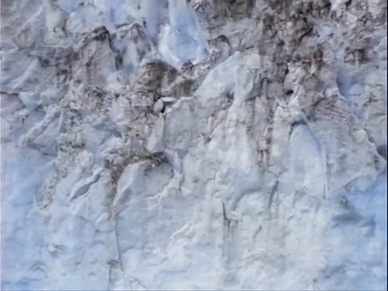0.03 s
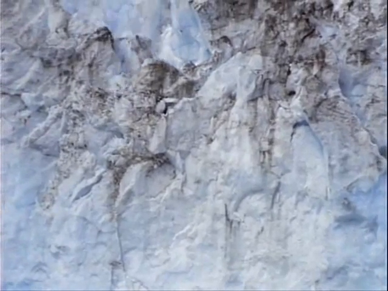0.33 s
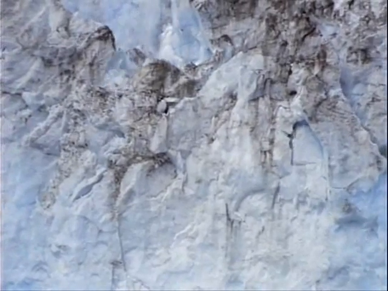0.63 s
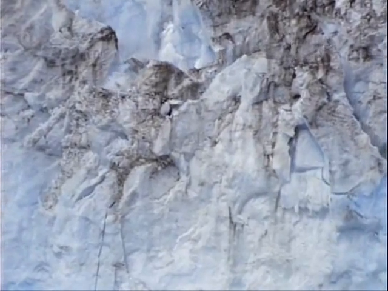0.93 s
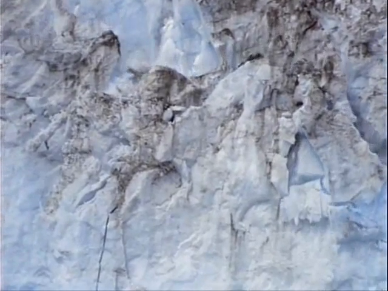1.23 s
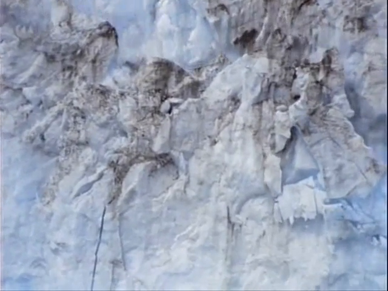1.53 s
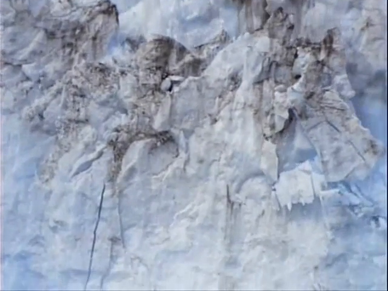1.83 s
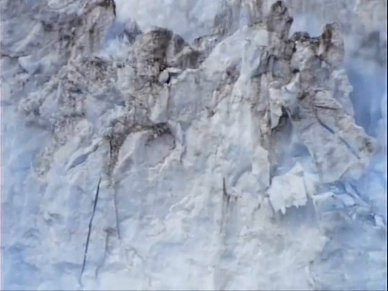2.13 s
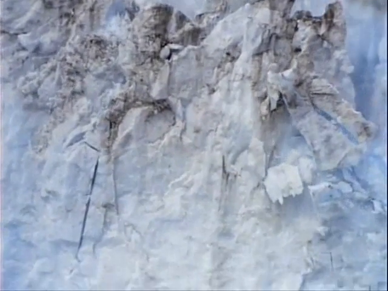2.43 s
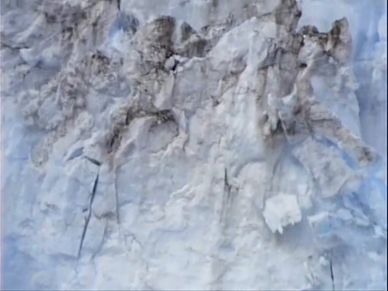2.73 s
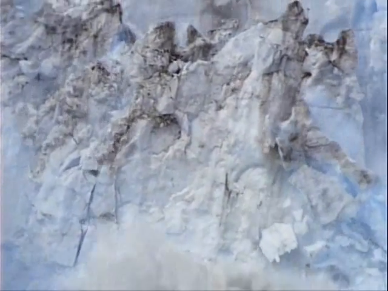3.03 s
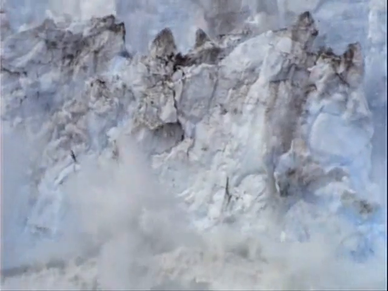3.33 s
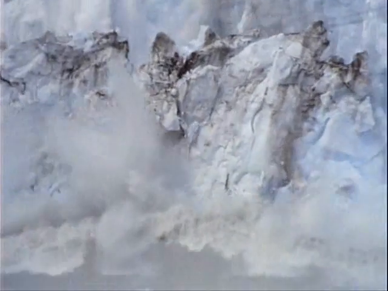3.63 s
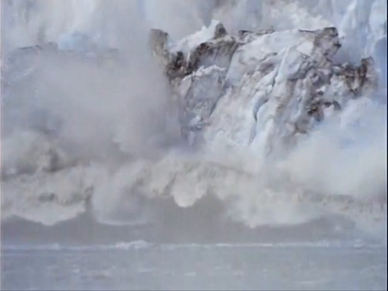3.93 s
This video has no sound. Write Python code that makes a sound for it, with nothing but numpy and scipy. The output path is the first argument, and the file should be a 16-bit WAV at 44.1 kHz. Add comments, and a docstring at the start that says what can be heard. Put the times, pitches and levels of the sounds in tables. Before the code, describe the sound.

Glacier ice cracks sharply, then collapses into water with a deep rumble and roaring crash.

```python
"""Glacier ice falling into the sea

Across open water, brittle fracture radiates sharp cracks; shifting blocks add thuds and booms over a
deep rumble. Rubble clatters down, the mass lands with a roar and spray hisses up. Meltwater runs,
the ice wall echoes, wind buffets the microphone, and the loudest moments overload it."""
import sys
import numpy as np
from scipy import signal
from scipy.fft import rfft, irfft
from scipy.io import wavfile
from scipy.ndimage import uniform_filter1d

SR = 44100
rng = np.random.default_rng(int(sys.argv[2]) if len(sys.argv) > 2 else 0)


def log_audio(samples):
    """Write samples as a 16-bit WAV file to the path given in sys.argv[1]."""
    # one column per channel
    frames = np.atleast_2d(samples).T
    # limit to full scale, then quantise
    limited = np.clip(frames, -1, 1)
    pcm = np.round(limited * 32767).astype(np.int16)
    wavfile.write(sys.argv[1], SR, pcm)


N = 176400

# Envelopes (t/s, level/dB) and spectra (f/Hz, level/dB) of the continuous sources
RUMBLE_ENVELOPE = [(0, -31), (.25, -40.5), (.55, -32.5), (.73, -29.5), (.79, -16), (1.0, -23.5),
                   (1.23, -22.5), (1.5, -22), (1.8, -25.5), (2.1, -29), (2.45, -28.5), (2.7, -32),
                   (2.82, -16.5), (3.1, -20), (3.45, -23.5), (3.75, -17.5), (4, -43)]  # the sliding mass
RUMBLE_SPECTRUM = [(10, -50), (25, -10), (42, 3.5), (58, 5), (75, 0), (100, -3), (150, -5.5), (220, -12.5),
                   (400, -28.5), (1000, -62)]
TUMBLE_ENVELOPE = [(0, -44), (.45, -43), (.72, -36), (.9, -24), (1.1, -24.5), (1.45, -42.5), (1.72, -32.5),
                   (2.0, -33.5), (2.4, -30), (2.62, -24.5), (2.72, -18), (2.97, -16), (3.08, -23),
                   (3.27, -22), (3.35, -15), (3.5, -17.5), (3.7, -17.5), (4, -20.5)]  # tumbling blocks
TUMBLE_SPECTRUM = [(40, 5.5), (110, 6.5), (180, 4), (300, -1), (500, -6), (800, -12.5), (1500, -25),
                   (4000, -60)]
RUBBLE_ENVELOPE = [(0, -40), (.6, -38), (.86, -38), (.89, -29.5), (1.0, -30.5), (1.25, -31.5), (1.48, -35),
                   (1.54, -30), (1.62, -32.5), (1.70, -32), (1.8, -32), (2.0, -41), (2.3, -37),
                   (2.55, -33.5), (2.66, -34.5), (2.69, -29), (2.97, -33), (3.07, -35.5), (3.2, -36),
                   (3.4, -30), (4, -30.5)]  # fragments clattering down the face
RUBBLE_SPECTRUM = [(150, 0.5), (500, 1), (1000, 3.5), (1600, 0.5), (2500, -2), (4500, -10), (7000, -19.5),
                   (11000, -26.5), (16000, -23)]
WIND_ENVELOPE = [(0, -27), (.3, -33), (.7, -29.5), (1.0, -35), (1.3, -30), (1.8, -29), (2.1, -31.5),
                 (2.6, -28.5), (3.0, -28), (3.4, -28), (3.7, -25), (4, -26.5)]  # eddies at the microphone
WIND_SPECTRUM = [(10, -33), (25, -16), (45, 1), (90, 5.5), (150, -3.5), (250, -10.5), (500, -16.5),
                 (1000, -23), (1700, -27), (2600, -49), (5000, -70), (16000, -77)]

# Sharp fractures (t/s, level/dB, treble tilt/dB, snap in the top octaves/dB)
CRACK_EVENTS = [(.372, -23, -8, -2), (.378, -28.5, 28, -14), (.418, -29, -5, -5), (.4477, -25, 8, 3),
                (.649, -28, 14, -4), (.677, -28, 5, -3), (.8754, -9, -1, 3), (.945, -25, 18, -3),
                (.9730, -13, 2, 5), (.9805, -18.5, 9, -5), (.998, -21, -17, 0), (1.0495, -19, 2, 3.5),
                (1.075, -19.5, -15, 1), (1.130, -21, 8, -14), (1.186, -18.5, -4, -3), (1.219, -18, -5, -6),
                (1.225, -19, 5, -4), (1.5223, -16.5, -3, 5.5), (1.572, -27, 7, 0), (1.577, -17, 2.5, -1),
                (1.656, -27, -1, 3), (1.672, -19, -1.5, 2), (1.722, -15, -20, 0), (1.819, -26.5, 5, -6),
                (1.852, -25, 5, 0), (2.242, -26.5, 5, -5), (2.417, -26.5, 13, -4), (2.445, -26.5, -7, -4),
                (2.4805, -19.5, -2, -5), (2.496, -25.5, 16, -12), (2.676, -23.5, -4, 1),
                (2.7425, -22.5, 3, 2), (2.789, -20, -11, -3), (2.925, -21.5, -5, 0),
                (2.965, -21.5, -3.5, -4), (3.104, -19.5, -1, 1), (3.269, -24, -6, 0), (3.416, -22, -12, 0),
                (3.627, -34, -8, -2)]
# Brittle splinters snapping off (t/s, level/dB, f/Hz)
SPLINTER_EVENTS = [(.4474, -17.5, 3150), (.4495, -35, 4200), (.677, -27, 2940), (1.0495, -28, 3470),
                   (1.0755, -21, 1800), (1.226, -18.5, 2070), (3.105, -19, 1690), (3.271, -23, 1610)]
# Slabs shifting and plunging (t/s, level/dB, initial f/Hz)
BOOM_EVENTS = [(.75, -17, 72.5), (.81, -19.5, 44.2), (1.32, -12.5, 51), (1.365, -17.5, 43.7),
               (1.585, -18, 62.3), (2.755, -16.5, 104), (2.86, -9, 114.2), (2.94, -8.5, 59),
               (3.165, -12, 44), (3.54, -12, 56), (3.65, -17, 166), (3.79, -14, 117)]
# Heavy blocks breaking loose or landing (t/s, level/dB, initial f/Hz)
THUD_EVENTS = [(.865, -13, 363), (.964, -14, 334), (1.069, -31, 200), (1.27, -28, 200), (1.516, -13.5, 397),
               (1.521, -19, 627), (1.662, -18.5, 320), (1.697, -17.5, 339), (1.716, -16.5, 312),
               (2.675, -16.5, 366), (2.83, -18, 185), (2.92, -20.5, 249), (2.938, -12.5, 555),
               (2.964, -18, 690), (2.988, -18, 479), (3.115, -17.5, 463), (3.352, -19, 673),
               (3.368, -15, 334), (3.408, -15.5, 561), (3.624, -12, 589)]
# Ice crushed between sliding slabs (t/s, duration/s, level/dB)
CRUNCH_EVENTS = [(.89, 0.047, -41), (.99, 0.1, -40), (1.53, 0.034, -28.5), (1.645, 0.065, -27.5),
                 (1.69, 0.091, -32), (2.69, 0.13, -38), (3.39, 0.05, -33), (3.935, 0.021, -42)]

# Spectra of the other sounds (f/Hz, level/dB)
MELTWATER_SPECTRUM = [(60, 11), (400, -2.5), (1100, 3.5), (2200, -2), (3500, -16), (5000, -10),
                      (8000, -20.5), (12000, -23), (16000, -35)]
ECHO_SPECTRUM = [(200, 0.5), (2000, -1), (5000, -23), (12000, -3.5)]
CRACK_SPECTRUM = [(150, 2.5), (500, -4), (1500, 11.5), (2500, 2.5), (4500, -6.5), (7000, -18.5),
                  (12000, -24), (16000, -25)]
CRUNCH_SPECTRUM = [(200, -16), (700, -1), (1300, 13.5), (2100, 8.5), (3000, -12.5), (5000, -17),
                   (12000, -29)]
SPLASH_SPECTRUM = [(1000, -6), (4000, -3), (8000, 0), (16000, -6)]
SPRAY_SPECTRUM = [(300, 1), (1200, 6), (2500, 0.5), (5000, -1), (7500, -6.5), (11000, -10.5), (16000, -17)]


def amp(db):
    """Amplitude ratio for a level in decibels."""
    return 10 ** (np.asarray(db) / 20)


def unit(x):
    """Normalisation to rms 1."""
    return x / np.sqrt(np.mean(x ** 2) + 1e-20)


def envelope(points):
    """Gain over time, interpolated in decibels."""
    return amp(np.interp(np.arange(N) / SR, *np.transpose(points)))


def colour(x, spectrum):
    """Spectral shaping, interpolated on a log-frequency axis; the result has rms 1."""
    hz = np.fft.rfftfreq(len(x), 1 / SR)
    table_hz, table_db = np.transpose(spectrum)
    gain = amp(np.interp(np.log(hz + 1), np.log(table_hz), table_db))
    return unit(irfft(rfft(x) * gain, len(x)))


def add(mix, start_s, sound):
    """Superposition of a sound on the mix, in place."""
    part = mix[round(start_s * SR):][:len(sound)]
    part += sound[:len(part)]


def wander(rate_hz):
    """Slow random modulation: low-passed noise of rms 1."""
    hz = np.fft.rfftfreq(N, 1 / SR)
    return unit(irfft(rfft(rng.standard_normal(N)) * (hz > 0) / (1 + (hz / rate_hz) ** 4), N))


def steady(x, span_s):
    """Division by the running rms evens out swells longer than the span."""
    power = uniform_filter1d(abs(signal.hilbert(x)) ** 2 / 2, int(span_s * SR))
    return x / np.sqrt(abs(power) + 1e-9)


def impacts(per_s, spread_db, wash):
    """Shot noise: random knocks of uneven size over a Gaussian blur of countless smaller ones."""
    size = amp(spread_db * np.minimum(rng.exponential(1, N), 4))
    knocks = size * rng.choice([-1, 1], N) * (rng.random(N) < per_s / SR)
    return unit(unit(knocks) + wash * rng.standard_normal(N))


def transient(t, rise_s, decay_s):
    """Linear attack followed by exponential damping."""
    return np.minimum(t / rise_s, 1) * np.exp(-np.maximum(t - rise_s, 0) / decay_s)


def unsteady_phase(t, pitch_hz, jitter, smooth_samples, sag_per_s=0):
    """Phase in radians: the integral of a frequency that wavers and may sag exponentially."""
    waver = unit(uniform_filter1d(rng.standard_normal(len(t)), smooth_samples))
    hz = pitch_hz * np.exp(-sag_per_s * t) * (1 + jitter * waver)
    return 2 * np.pi * np.cumsum(hz) / SR


def rumble():
    """The sliding mass radiates low-frequency noise."""
    shudder = colour(rng.standard_normal(N), RUMBLE_SPECTRUM)
    return steady(shudder, span_s=0.07) * envelope(RUMBLE_ENVELOPE)


def tumble():
    """Dull knocks of blocks sum incoherently, into a roar as they hit the water."""
    knocks = colour(impacts(per_s=300, spread_db=-0.5, wash=1.0), TUMBLE_SPECTRUM)
    return steady(knocks, span_s=0.1) * envelope(TUMBLE_ENVELOPE)


def rubble(clump_db=1.4):
    """Fragments strike the face in clumps, giving amplitude-modulated shot noise."""
    clicks = impacts(per_s=900, spread_db=2.0, wash=0.73) * amp(clump_db * wander(rate_hz=32))
    return colour(clicks, RUBBLE_SPECTRUM) * envelope(RUBBLE_ENVELOPE)


def meltwater(db=-40.5, flicker_db=-1.4):
    """Distant running water is a nearly stationary noise."""
    gain = amp(db + flicker_db * wander(rate_hz=48))
    return gain * colour(impacts(per_s=1200, spread_db=-2, wash=0.47), MELTWATER_SPECTRUM)


def wind(gust_db=-1.0):
    """Turbulent eddies make the pressure fluctuate at one microphone port."""
    eddies = colour(rng.standard_normal(N), WIND_SPECTRUM)
    return eddies * envelope(WIND_ENVELOPE) * amp(gust_db * wander(rate_hz=8.7))


def echo(x, db=-12.5, rise_s=0.011, t60_s=0.78):
    """Diffuse reflection from the ice wall: convolution with a decaying noise."""
    t = np.arange(SR) / SR
    tail = rng.standard_normal(SR) * np.minimum(t / rise_s, 1) * amp(-60 * t / t60_s)
    tail = colour(tail, ECHO_SPECTRUM)
    return amp(db) * signal.fftconvolve(x, tail / np.linalg.norm(tail))[:N]


def crack(db, tilt_db, snap_db, pivot_hz=1600, snap_hz=6500, rise_s=0.0013, scatter_db=-20):
    """Brittle fracture emits a broadband pulse; scattering from the rough face adds a short tail."""
    t = np.arange(SR // 8) / SR
    spectrum = [(hz, base_db + tilt_db * np.clip(np.log2(hz / pivot_hz), -1, 1) + snap_db * (hz > snap_hz))
                for hz, base_db in CRACK_SPECTRUM]
    tear = steady(colour(rng.standard_normal(len(t)), spectrum), span_s=0.0017)
    pulse = transient(t, rise_s, decay_s=0.0019 * 2 ** (-tilt_db / 24))  # dull cracks last longer
    scatter = amp(scatter_db) * transient(t, rise_s, decay_s=0.053)
    return amp(db) * tear * (pulse + scatter)


def splinter(db, pitch_hz):
    """A splinter snaps off and rings in a heavily damped, slightly unsteady free vibration."""
    t = np.arange(SR // 30) / SR
    phase = unsteady_phase(t, pitch_hz, jitter=0.13, smooth_samples=12)
    return amp(db) * np.sin(phase) * transient(t, rise_s=0.00064, decay_s=0.0031)


def boom(db, pitch_hz):
    """A heaving slab makes a slow damped oscillation whose frequency sags as it fades."""
    t = np.arange(SR // 2) / SR
    phase = unsteady_phase(t, pitch_hz, jitter=0.19, smooth_samples=300, sag_per_s=1.45)
    phase += 2 * np.pi * rng.random()
    return amp(db) * np.sin(phase) * transient(t, rise_s=0.027, decay_s=0.043)


def thud(db, pitch_hz, grit_db=-8.5, half_width_octaves=0.48):
    """A block gives way: a damped oscillation of falling pitch within a band of gritty noise."""
    t = np.arange(SR // 5) / SR
    hz = np.geomspace(20, 16000, 40)
    band_db = -10 * np.log10(1 + (np.log2(hz / pitch_hz) / half_width_octaves) ** 4)
    band_db -= 6 * np.maximum(np.log2(hz / 1500), 0)  # a further 6 dB per octave off the treble
    grit = steady(colour(rng.standard_normal(len(t)), np.column_stack([hz, band_db])), span_s=0.01)
    phase = unsteady_phase(t, pitch_hz, jitter=0.14, smooth_samples=80, sag_per_s=9.1)
    body = np.sin(phase) + amp(grit_db) * grit
    return amp(db) * body * transient(t, rise_s=0.0049, decay_s=0.012)


def crunch(length_s, db, grains_per_s=1400):
    """Ice under compression emits a swelling and fading burst of tiny fracture pulses."""
    n = int(length_s * SR)
    grains = rng.standard_normal(SR // 4) * (rng.random(SR // 4) < grains_per_s / SR)
    return amp(db) * colour(grains, CRUNCH_SPECTRUM)[:n] * np.sqrt(np.hanning(n))


def splash(db=-42, decay_s=0.055):
    """The impact of the first slab on the water excites bright, exponentially decaying noise."""
    t = np.arange(SR // 2) / SR
    return amp(db) * colour(rng.standard_normal(len(t)), SPLASH_SPECTRUM) * np.exp(-t / decay_s)


def spray(start_s=3.02, rise_s=0.28, db=-37.5, growth_db_per_s=7, surge_db=1.0):
    """Water thrown up by the fall comes down as shot noise, heard as a growing hiss."""
    t = np.arange(N) / SR - start_s
    swell = np.clip(t / rise_s, 0, 1) * amp(db + growth_db_per_s * t)
    drops = colour(impacts(per_s=1400, spread_db=3.5, wash=0.75), SPRAY_SPECTRUM)
    return drops * swell * amp(surge_db * wander(rate_hz=38))


def saturate(x, ceiling_db, knee=4.9):
    """Soft saturation rounds off peaks at the ceiling."""
    return x / (1 + abs(x / amp(ceiling_db)) ** knee) ** (1 / knee)


def scene(echo_width=0.17):
    """Distant ice is coherent in both channels; its echo spreads wider, and each port has its own wind."""
    breaks = np.zeros(N)
    for events, source in [(CRACK_EVENTS, crack), (SPLINTER_EVENTS, splinter), (CRUNCH_EVENTS, crunch),
                           (THUD_EVENTS, thud), (BOOM_EVENTS, boom)]:
        for start_s, *settings in events:
            add(breaks, start_s, source(*settings))
    direct = breaks + tumble() + rubble() + spray()
    add(direct, start_s=2.872, sound=splash())
    direct += meltwater()
    mid = direct + echo(breaks) + rumble()
    side = echo_width * echo(direct)
    return np.array([mid + side + wind(), mid - side + wind()])


def record(dry, crossover_hz=1370, microphone_band_hz=(5.6, 7460), limit_hz=15650):
    """Bass and treble saturate separately; a gentle microphone band-pass and a steep low-pass follow."""
    bass = signal.sosfiltfilt(signal.butter(2, crossover_hz, fs=SR, output="sos"), dry)
    overloaded = saturate(bass, ceiling_db=-12) + saturate(dry - bass, ceiling_db=-14.5)
    microphone = signal.butter(1, microphone_band_hz, "bandpass", fs=SR, output="sos")
    low_pass = signal.firwin(1023, limit_hz, window=("kaiser", 9), fs=SR)
    return signal.oaconvolve(signal.sosfilt(microphone, overloaded), low_pass[None], "same")


dry = scene()
out = record(dry)
log_audio(out)
```